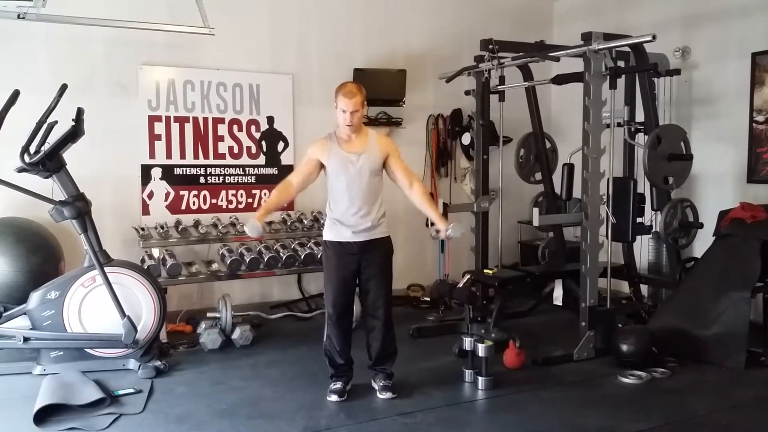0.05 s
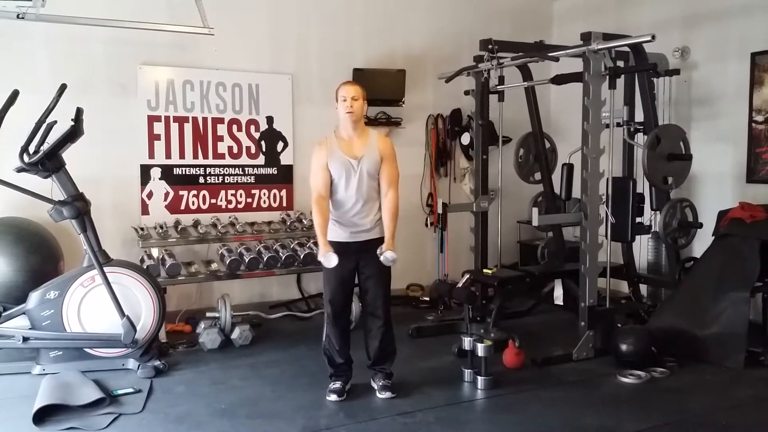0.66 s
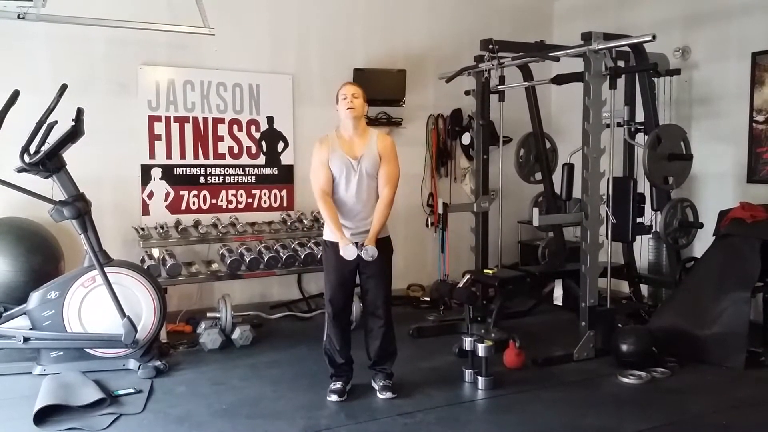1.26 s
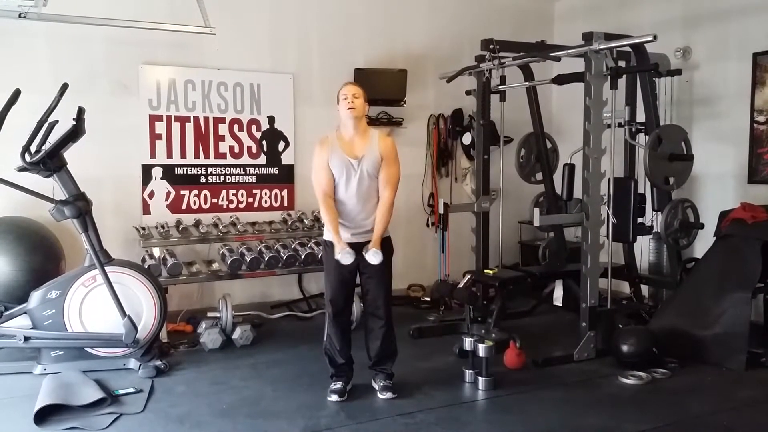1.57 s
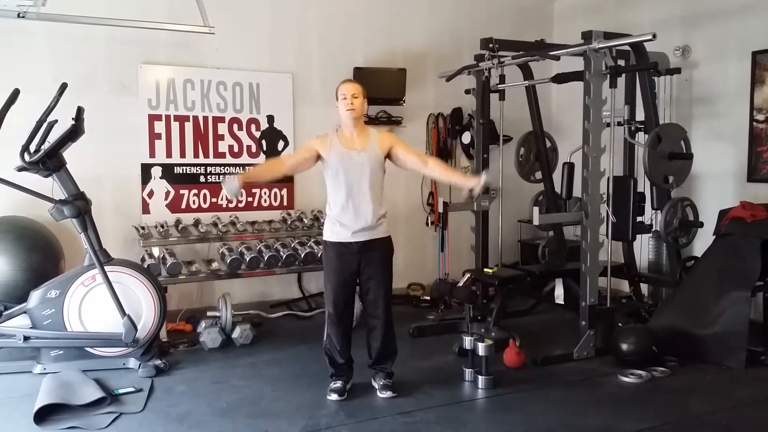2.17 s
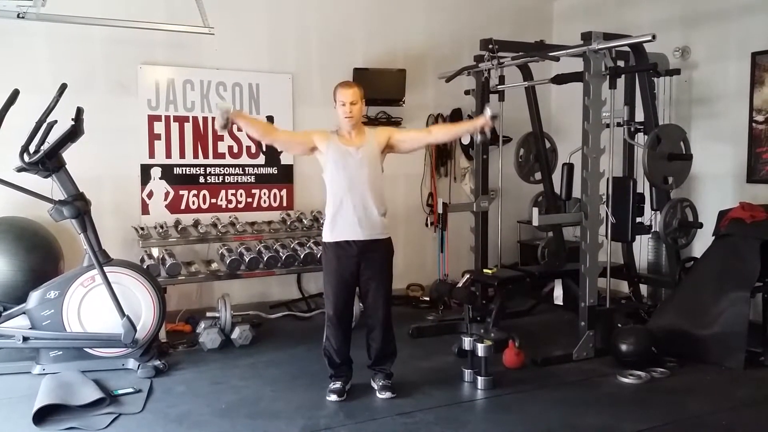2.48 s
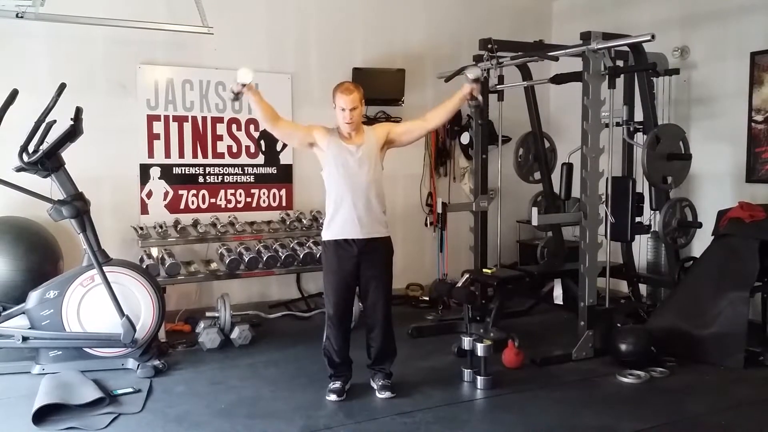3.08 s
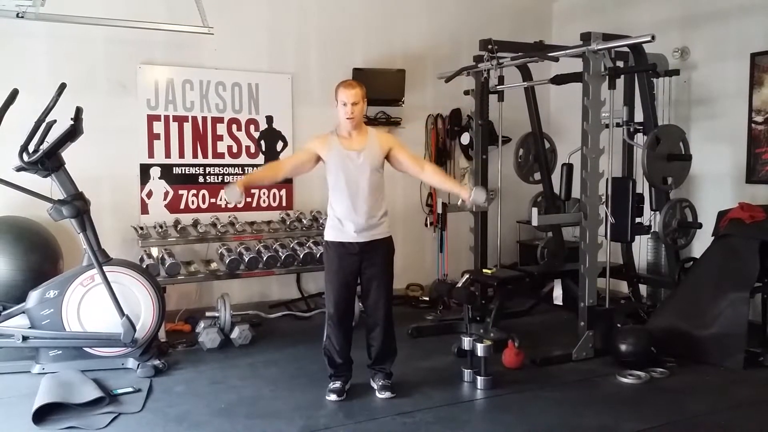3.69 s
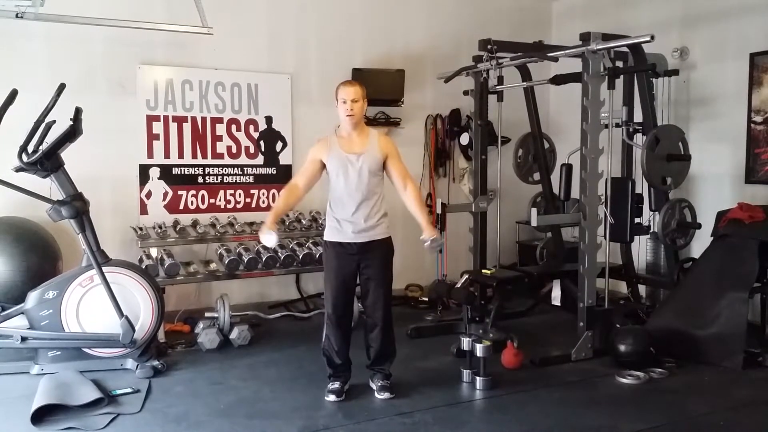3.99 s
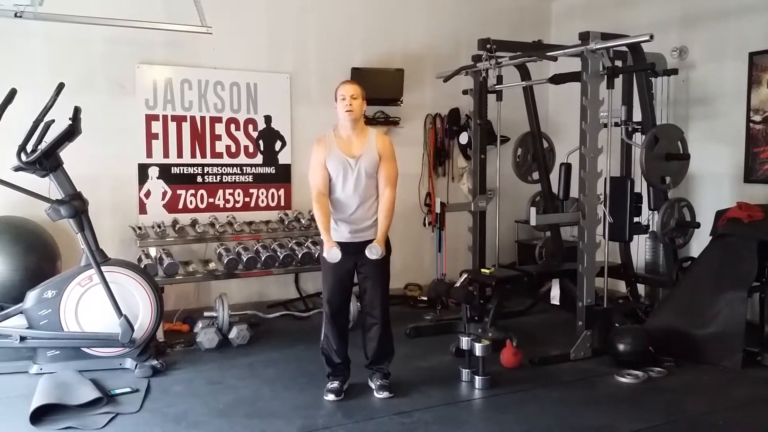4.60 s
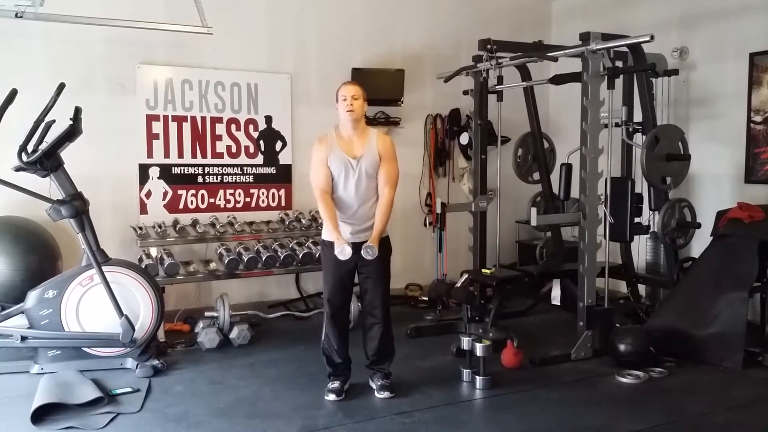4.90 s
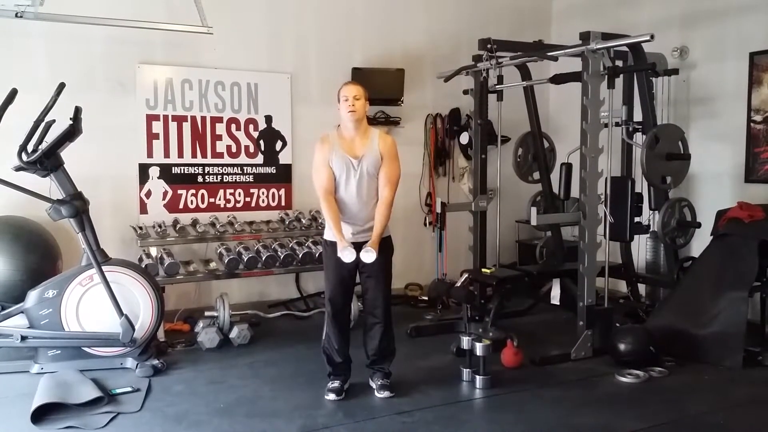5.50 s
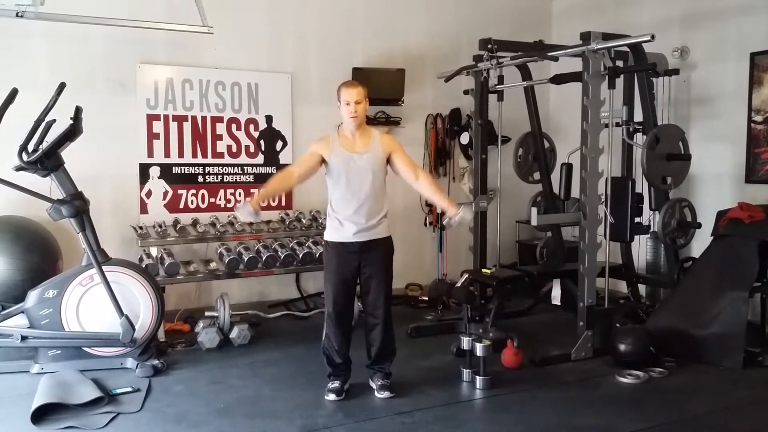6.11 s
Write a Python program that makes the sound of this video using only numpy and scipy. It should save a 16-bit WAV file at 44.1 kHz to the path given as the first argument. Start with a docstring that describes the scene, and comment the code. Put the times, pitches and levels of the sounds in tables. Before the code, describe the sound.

A faint, high, fluttering hiss with a few tiny ticks runs throughout, over low rumble and a soft wash of air in a hard-walled gym. At about 1.4 seconds two small dumbbells tap together near the microphone, a dry click with a short clear ring, alongside three tiny, thin electronic chirps. Across the room, heavy steel equipment knocks dully at 2.3 seconds, followed by a few light contacts and a loud, quick cluster of ringing clanks around 2.9 seconds that booms off the walls. Soft deep thuds follow near 3.3 seconds and, more faintly, just after 4. A very faint bird outside gives a falling whistle every second or so from 1.5 to 5.5 seconds, twittering briefly around 2. From 6 seconds to the end comes a second loud burst of rattling steel clanks, with a deep thud beneath.

```python
"""Steel weights clank in a hard-walled garage gym, heard from one microphone. Across the room heavy gear
knocks and rattles, each blow booming off the walls; nearer, two small dumbbells tap together.
Behind them lie deep thuds, a low room rumble, a soft wash of air and a faint bird outside. A high
fluttering fizz with small ticks and three thin chirps is likely the camera's electronics."""
import sys
import numpy as np
from scipy import signal
from scipy.fft import rfft, irfft, next_fast_len
from scipy.io import wavfile
from scipy.ndimage import uniform_filter1d

SR = 44100
rng = np.random.default_rng(int(sys.argv[2]) if len(sys.argv) > 2 else 0)


def generate_wav(sig):
    """Save sig (samples, or channels by samples) to the path in sys.argv[1] as 16-bit PCM at SR."""
    pcm = np.round(np.clip(np.atleast_2d(sig).T, -1, 1) * 32767).astype(np.int16)
    wavfile.write(sys.argv[1], SR, pcm)


N = 279930
GRIND_S = 0.0015  # rise time of a heavy contact at 0 dB of bite
# low spectrum of the room, under its rumble and the thuds: (frequency [Hz], level [dB])
RUMBLE_SPECTRUM = [(20, -42), (38, -15.5), (58, -4.5), (90, -2.5), (130, -1.5), (200, -12), (320, -16.5),
                   (700, -21.5), (2200, -35)]


def amp(db):
    """Decibels to gain."""
    return 10 ** (np.asarray(db) / 20)


def unit(x):
    """Scale to rms 1."""
    return x / np.sqrt(np.mean(x ** 2) + 1e-20)


def along(points, hz):
    """Read (frequency, value) points on a log frequency axis."""
    point_hz, values = np.transpose(points)
    return np.interp(np.log(hz + 1), np.log(point_hz + 1), values)


def add(track, s, sound):
    """Mix a sound into the track from second s on."""
    part = track[round(s * SR):][:len(sound)]
    part += sound[:len(part)]


def coloured(x, spectrum):
    """x shaped by a spectrum, at rms 1."""
    size = next_fast_len(len(x) + 8192)
    gain = amp(along(spectrum, np.fft.rfftfreq(size, 1 / SR)))
    return unit(irfft(rfft(x, size) * gain, size)[:len(x)])


def swell(rest_db, rise_db, peak_s, width_s):
    """A gain that rises slowly to one peak and sinks back."""
    return amp(rest_db + rise_db * np.exp(-((np.arange(N) / SR - peak_s) / width_s) ** 2 / 2))


def whistle(hz, rough_hz):
    """A tone whose pitch trembles quickly."""
    jitter = unit(uniform_filter1d(rng.standard_normal(len(hz)), size=60))
    return np.sin(2 * np.pi * np.cumsum(hz + rough_hz * jitter) / SR)


def treble(hz, knee_hz=1800, top_hz=7000):
    """Octaves above the knee, where the hardness of a contact matters; constant above top_hz."""
    return np.log2(1 + (np.minimum(hz, top_hz) / knee_hz) ** 2) / 2


def push(spectrum, tilt_db=0, hollow_hz=1400, hollow_db=0, size=4096):
    """A contact pulse of energy 1: hardness tilts its treble up, and the struck part lifts one band."""
    hz = np.fft.rfftfreq(size, 1 / SR)
    resonance_db = hollow_db / (1 + ((hz / hollow_hz - 1) / 0.088) ** 2)
    db = along(spectrum, hz) + tilt_db * treble(hz) + resonance_db
    cepstrum = irfft(np.log(amp(db)))
    cepstrum[1:size // 2] *= 2  # minimum phase: the energy comes at the start
    cepstrum[size // 2 + 1:] = 0
    pulse = irfft(np.exp(rfft(cepstrum)))
    return pulse / np.linalg.norm(pulse)


def ring(modes, tilt_db=0):
    """Struck metal rings in decaying modes, their levels and pitches a little new each time; energy 1."""
    t = np.arange(SR) / SR
    hz, db, t60 = np.transpose(modes)[:, :, None]
    db = db + tilt_db * treble(hz) + 2 * rng.standard_normal(hz.shape)
    hz = hz + 2 * rng.standard_normal(hz.shape)
    polarity = rng.choice([-1, 1], hz.shape)
    tone = np.sum(amp(db - 60 * t / t60) * polarity * np.sin(2 * np.pi * hz * t), axis=0)
    return tone / np.linalg.norm(tone)


def room(early_db, early_t60, build_s, attack_s=0.00041):
    """One path through the gym to the microphone: near reflections, then a diffuse tail builds up."""
    # reverberation between the hard walls: (frequency [Hz], t60 [s])
    decay_times = [(100, 3.1), (250, 1.65), (600, 1.21), (1500, 0.86), (3000, 0.67), (6000, 0.6),
                   (12000, 0.38)]
    hz, s, noise = signal.stft(rng.standard_normal(3 * SR // 2), SR, nperseg=256)
    decay = amp(-60 * s / along(decay_times, hz)[:, None])
    tail = signal.istft(noise * decay, SR, nperseg=256)[1]
    t = np.arange(len(tail)) / SR
    early = amp(early_db - 60 * t / early_t60) * rng.standard_normal(len(t))
    return (early + tail * (1 - np.exp(-t / build_s))) * (1 - np.exp(-t / attack_s))


def boom(pulse, grind_s):
    """The low answer of the room, which swells after a pulse."""
    return signal.fftconvolve(pulse, room(early_db=-4, early_t60=.08, build_s=.02, attack_s=grind_s))


def room_tone():
    """Low rumble and a broad wash of air all round the microphone; each swells once."""
    # the wash of air: (frequency [Hz], level [dB])
    air_spectrum = [(50, -34), (130, 0.5), (300, -1.5), (700, -6.5), (1200, -10), (2200, -15.5),
                    (5000, -20), (12500, -35), (16000, -24.5)]
    rumble = coloured(rng.standard_normal(N), RUMBLE_SPECTRUM)
    air = coloured(rng.standard_normal(N), air_spectrum)
    return (rumble * swell(rest_db=-58.4, rise_db=3.2, peak_s=3, width_s=1.0)
            + air * swell(rest_db=-60, rise_db=5.7, peak_s=1.91, width_s=1.18))


def fizz(flutter_hz=29.6):
    """A high hiss, likely electronics by the microphone, flutters unevenly, crackles and ticks."""
    # the hiss: (frequency [Hz], level [dB])
    hiss_spectrum = [(3000, -55), (5300, -26), (6400, -14), (7200, -4), (7950, 0), (8550, -2.7), (9000, -8),
                     (9550, -5.5), (10400, -14.5), (10950, -12.5), (11500, -16), (12200, -28), (16000, -42)]
    # sharper ticks in the hiss: (time [s], level [dB])
    ticks = [(0.079, -35.5), (0.116, -39.5), (0.884, -35.5), (0.891, -40), (1.930, -40), (1.96, -37),
             (5.903, -35), (5.908, -44), (5.929, -37), (5.967, -40)]
    # one tick: (frequency [Hz], level [dB])
    tick_spectrum = [(5500, -35), (7400, -6), (8100, 7), (8900, -7), (10000, -20), (13000, -50)]
    cycle = 2 * np.pi * flutter_hz * np.arange(N) / SR
    flutter = unit(sum(np.cos(k * cycle + rng.uniform(0, 2 * np.pi)) for k in range(1, 5)))
    waver = unit(signal.fftconvolve(rng.standard_normal(N), signal.windows.hann(SR // 12), "same"))
    crackle = unit(uniform_filter1d(rng.standard_normal(N), size=90))
    swing_db = 2.1 * flutter + waver + 1.4 * crackle
    hiss = coloured(rng.standard_normal(N) * amp(swing_db), hiss_spectrum)
    hiss *= swell(rest_db=-53.6, rise_db=3.5, peak_s=3.5, width_s=1.15)
    t = np.arange(SR // 20) / SR
    tick_shape = amp(-60 * t / .03) * (1 - np.exp(-t / .0007))
    for s, db in ticks:
        add(hiss, s, amp(db) * tick_shape * coloured(rng.standard_normal(len(t)), tick_spectrum))
    return hiss


def thin_chirps(at_s=1.386, chirp_s=.036, start_hz=7860, rise_hz=380, first_db=-43.5, step_db=2):
    """Three thin rising chirps near 8 kHz, likely from the same electronics as the fizz."""
    hz = start_hz + rise_hz * np.linspace(0, 1, int(chirp_s * SR))
    shape = signal.windows.tukey(len(hz), .5)
    chirps = [amp(first_db + step_db * k) * shape * whistle(hz, rough_hz=110) for k in range(3)]
    out = np.zeros(N)
    add(out, at_s, np.concatenate(chirps))
    return out


def bird(start_hz=7200, end_hz=4750, fall_s=.05, call_s=0.14, note_s=0.077):
    """A distant bird outside twitters and slides down in husky whistles; only its echo comes in."""
    # short twittered notes: (time [s], pitch [Hz], level [dB])
    twitter = [(1.79, 3830, -64), (1.87, 3970, -64), (1.9, 5200, -60), (1.97, 4600, -63), (2.05, 3790, -64)]
    # falling whistles: (time [s], level [dB])
    calls = [(1.449, -60.5), (2.73, -57), (4.069, -57), (5.50, -59)]
    song = np.zeros(N)
    note_shape = signal.windows.hann(int(note_s * SR))
    for s, hz, db in twitter:
        add(song, s, amp(db) * note_shape * whistle(np.full(len(note_shape), hz), rough_hz=300))
    t = np.arange(int(call_s * SR)) / SR
    slide = np.exp(-(t / fall_s) ** 2 / 2)
    for s, db in calls:
        call = whistle(end_hz + (start_hz - end_hz) * slide, rough_hz=170 + 480 * slide)
        add(song, s, amp(db) * unit(call * signal.windows.tukey(len(t), .5)))
    path = room(early_db=0, early_t60=.1, build_s=.01)
    return signal.fftconvolve(song, path / np.linalg.norm(path))[:N]


def thuds():
    """Deep thuds in the room, some under the clanks and some alone."""
    # deep thuds: (time [s], level [dB], resonance [Hz])
    deep_thuds = [(2.3, -51.5, 230), (3.2, -50.5, 149.8), (3.36, -49.5, 339), (4.04, -53, 80),
                  (4.2, -53, 65), (6.02, -46, 126), (6.19, -40, 139)]
    out = np.zeros(N)
    for s, db, hz in deep_thuds:
        add(out, s, amp(db) * boom(push(RUMBLE_SPECTRUM, hollow_hz=hz, hollow_db=11.5), GRIND_S))
    return out


def dumbbells():
    """Nearer the microphone, two small heads tap with a click and one clear note."""
    # the heads meet and bounce: (time [s], click level [dB], ring level [dB])
    taps = [(1.406, -42.5, -38), (1.411, -43.5, -56)]
    # the dry click of contact: (frequency [Hz], level [dB])
    click_spectrum = [(150, -22), (450, -9), (700, -12), (950, -4), (1400, 0.5), (2100, -4.5), (2800, -3),
                      (3400, -6.5), (4500, -14.5), (6000, -16), (9000, -22), (15000, -45)]
    # partials of a dumbbell: (frequency [Hz], level [dB], t60 [s])
    dumbbell_modes = [(900, -11, 0.056), (1235, -13, 0.044), (1620, -9, 0.045), (2620, -1.5, 0.024),
                      (2650, 2.5, 0.071), (2870, -12, .05)]
    out = np.zeros(N)
    for s, click_db, ring_db in taps:
        path = room(early_db=8.5, early_t60=0.04, build_s=0.0074)
        add(out, s, amp(click_db) * signal.fftconvolve(push(click_spectrum), path))
        add(out, s, amp(ring_db) * signal.fftconvolve(ring(dumbbell_modes), path))
    return out


def heavy_gear(firm_db=-30, bite_halves_db=11):
    """Across the room, each blow on steel gives a broad clank, a ring, a bright chink and a boom."""
    # blows, whose bite is the level of the chink over the clank:
    # (time [s], strength [dB], treble tilt [dB/octave], hollow resonance [Hz], bite [dB])
    blows = [(2.284, -41, -8, 2460, -25), (2.297, -37, -11, 853, -10), (2.398, -50, -2, 1400, -6),
             (2.598, -53, -7, 1300, 1), (2.795, -43.5, -11, 1717, -30.5), (2.872, -36, -1, 2607, -6),
             (2.882, -28, 2.5, 2030, -0.5), (2.892, -28.5, -9.5, 1390, -5.5), (2.934, -32, -3, 1980, -11),
             (3.19, -46.5, -7, 1410, -21), (6.004, -34.5, 2.5, 2180, -10), (6.016, -28.5, 0, 1190, -10),
             (6.124, -33.5, -6.5, 970, -7), (6.132, -31, 0, 4220, 6.5), (6.152, -30.5, 0.5, 3650, -10),
             (6.181, -26, 2, 2740, -17), (6.22, -32, -9.5, 1040, -22.5)]
    # the broad clank: (frequency [Hz], level [dB])
    clank_spectrum = [(60, -35), (200, -18.5), (430, -10.5), (650, -4.5), (1000, -3), (1400, 0),
                      (1800, -2.5), (2500, -4), (3600, -8), (5200, -11), (6000, -10), (8500, -19.5),
                      (11000, -24), (15500, -42)]
    # long-ringing partials of the gear: (frequency [Hz], level [dB], t60 [s])
    steel_modes = [(607, -7, .9), (945, -5, .8), (1358, -3, .7), (1462, -1, .8), (1741, -5, .7),
                   (1960, -6, .6), (2185, 0, .7), (2402, 0, .7), (2600, -2, .4), (2823, -2, .6),
                   (3128, -5, .5), (3278, -6, .6), (4500, -9, .5), (4980, 1, .45), (5085, -4, .45),
                   (5250, -2, .25)]
    # a quickly dying cluster of high partials: (frequency [Hz], level [dB], t60 [s])
    chink_modes = [(6700, -15.5, 0.022), (7140, -4.5, 0.01), (7670, -10, 0.017), (7740, 3, 0.0072),
                   (8030, -1.5, 0.0083), (8300, -15, 0.0044)]
    # the boom of the room: (frequency [Hz], level [dB])
    boom_spectrum = [(35, -37), (70, -10), (110, -16), (138, 1), (175, -6.5), (240, -6), (330, -4.5),
                     (550, -12), (1200, -39), (4000, -60)]
    out = np.zeros(N)
    for s, db, tilt_db, hollow_hz, bite_db in blows:
        ring_db = -41.5 + 1.38 * (db - firm_db) - .15 * bite_db  # strong blows ring, biting ones less
        boom_db = -43 + 0.73 * (db - firm_db) - 0.31 * tilt_db  # dull blows boom more
        grind_s = GRIND_S * .5 ** (bite_db / bite_halves_db)  # biting blows start faster
        path = room(early_db=8, early_t60=0.074, build_s=0.0059, attack_s=grind_s)
        clank = push(clank_spectrum, tilt_db, hollow_hz, hollow_db=7.0)
        add(out, s, amp(db) * signal.fftconvolve(clank, path))
        steel = ring(steel_modes, tilt_db - 1.8)
        steel /= np.std(steel[:SR // 20])  # rms 1 over the first 50 ms
        add(out, s, amp(ring_db) * steel)
        add(out, s, amp(ring_db - 8) * signal.fftconvolve(steel, path / np.linalg.norm(path)))
        chink = ring(chink_modes)
        chink_path = room(early_db=9.5, early_t60=0.065, build_s=0.016, attack_s=grind_s)
        add(out, s, amp(db + bite_db) * signal.fftconvolve(chink, chink_path))
        add(out, s, amp(boom_db) * boom(push(boom_spectrum), grind_s))
    return out


def scene():
    """Everything reaches one microphone, so both channels are alike."""
    mono = room_tone() + heavy_gear() + thuds() + dumbbells() + thin_chirps() + bird() + fizz()
    return np.array([mono, mono])


def record(dry):
    """The camera rolls off the deepest bass and keeps nothing above its band limit."""
    low_cut_hz, top_hz = 40, 15760
    size = next_fast_len(N + 8192)
    thinned = signal.sosfilt(signal.butter(4, low_cut_hz, "highpass", fs=SR, output="sos"), dry)
    in_band = np.fft.rfftfreq(size, 1 / SR) < top_hz
    return irfft(rfft(thinned, size) * in_band, size)[:, :N]


dry = scene()
out = record(dry)
generate_wav(out)
```